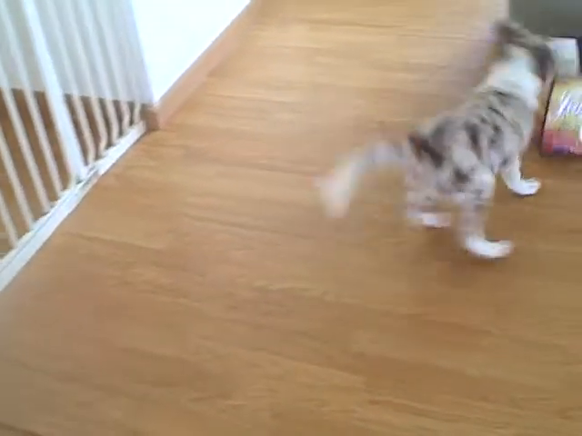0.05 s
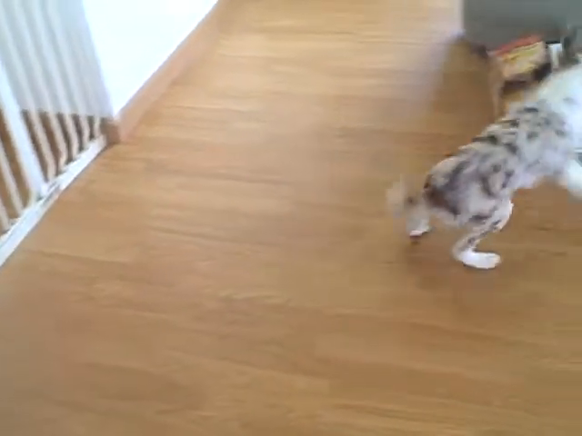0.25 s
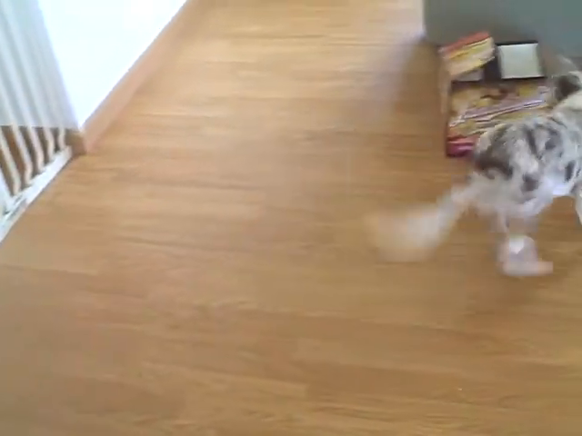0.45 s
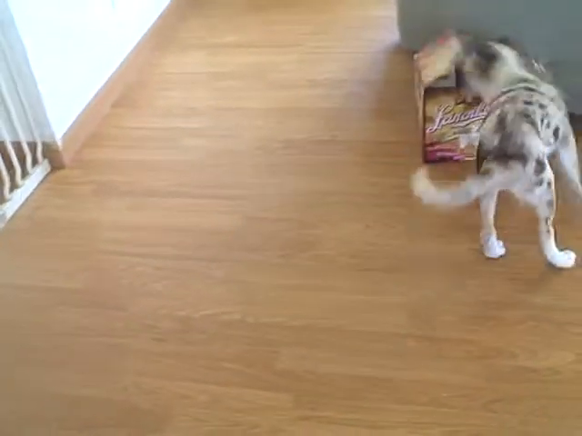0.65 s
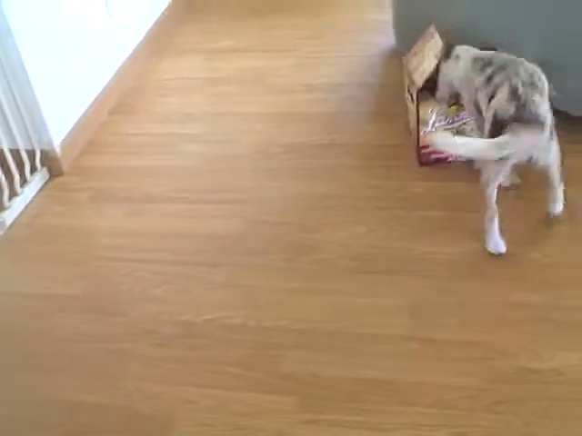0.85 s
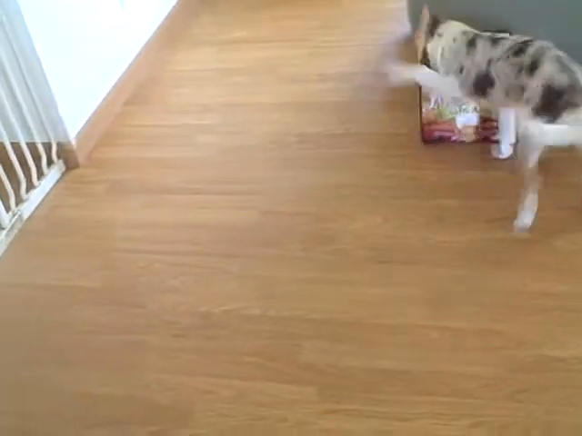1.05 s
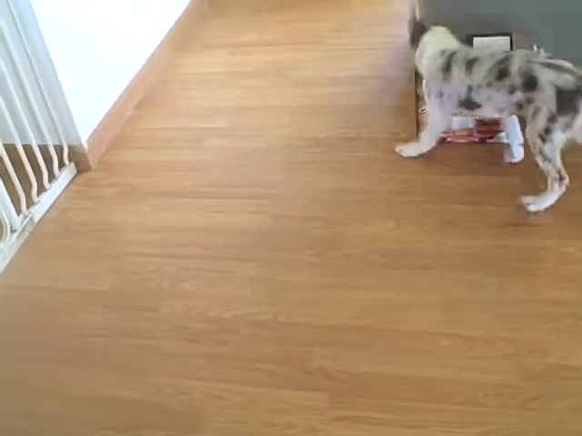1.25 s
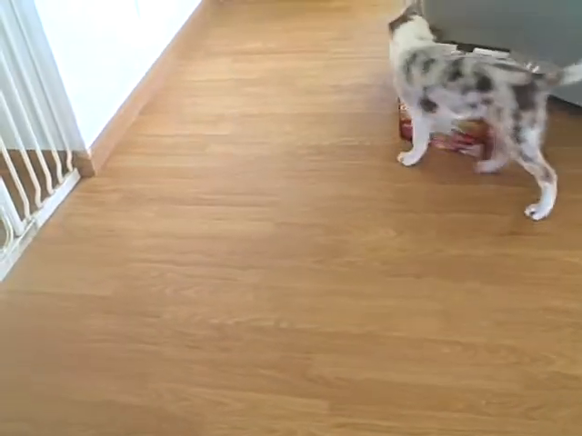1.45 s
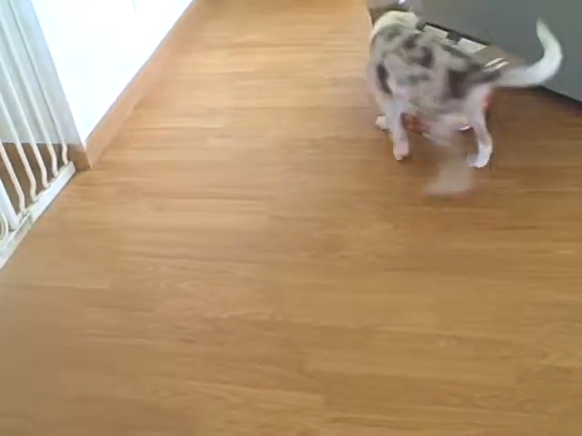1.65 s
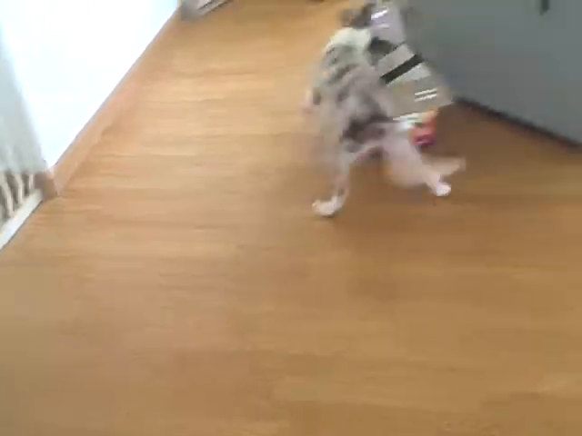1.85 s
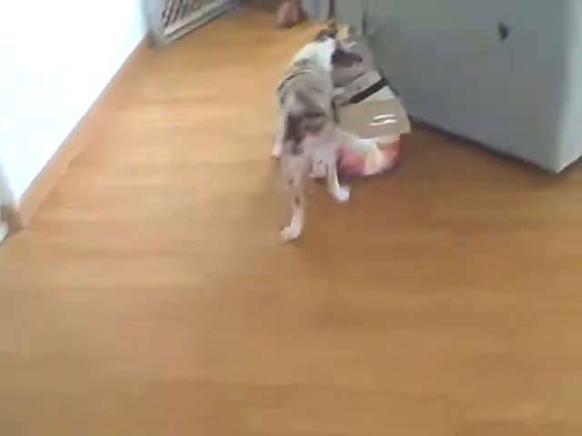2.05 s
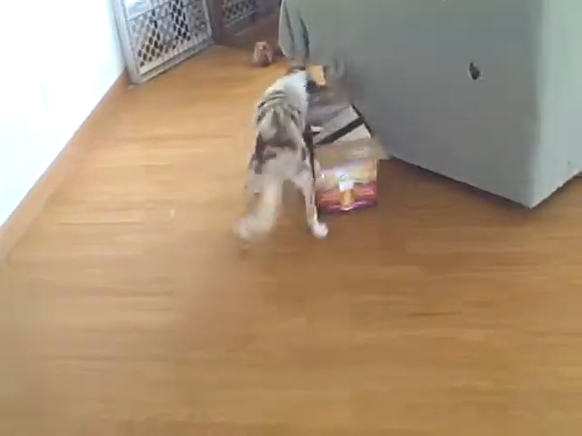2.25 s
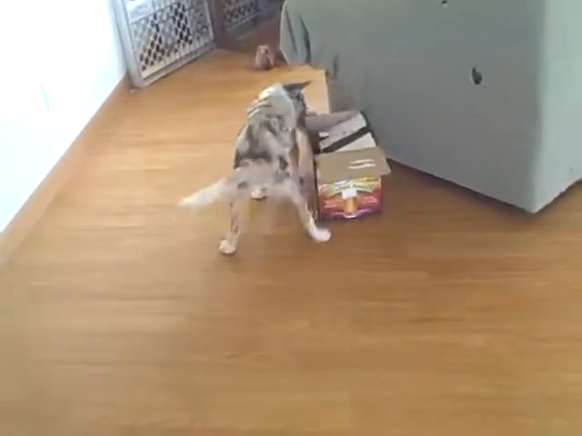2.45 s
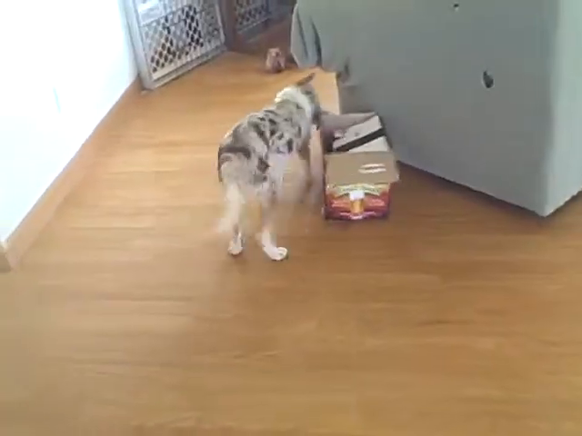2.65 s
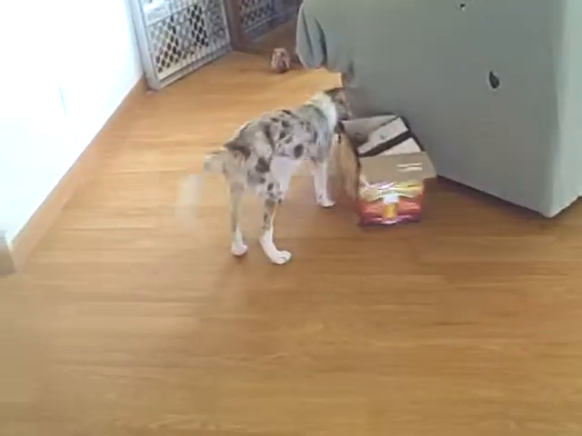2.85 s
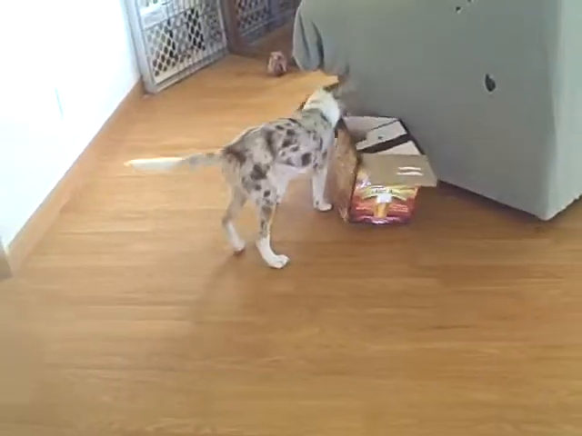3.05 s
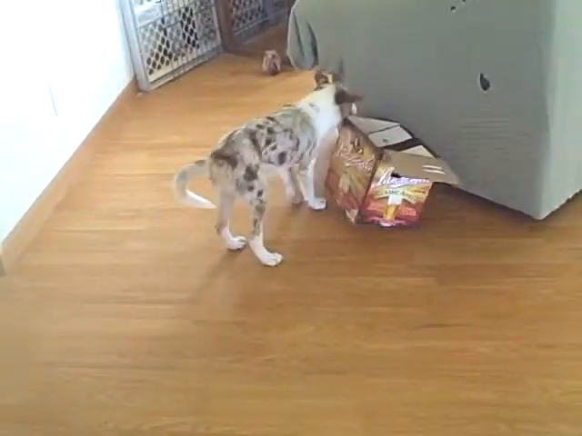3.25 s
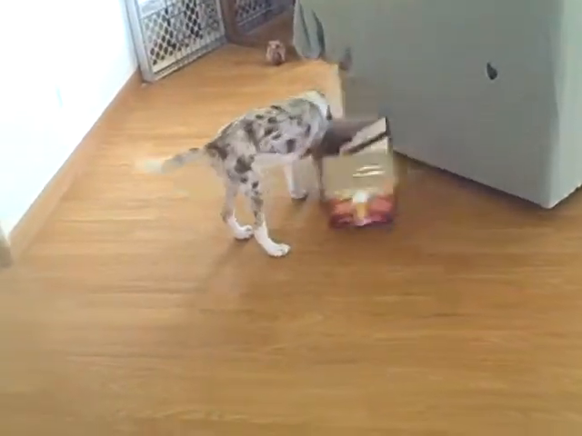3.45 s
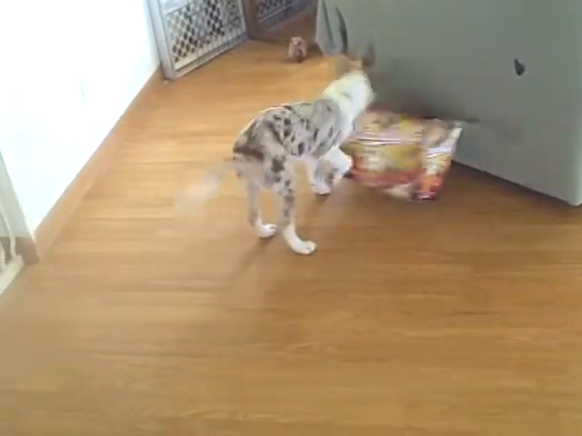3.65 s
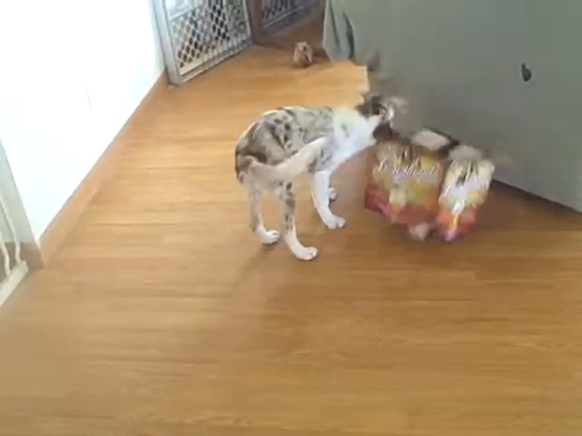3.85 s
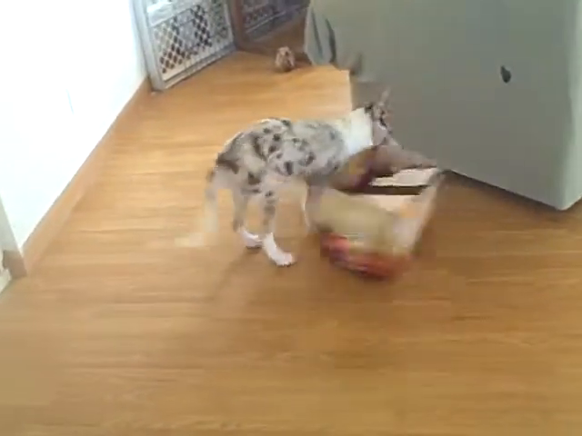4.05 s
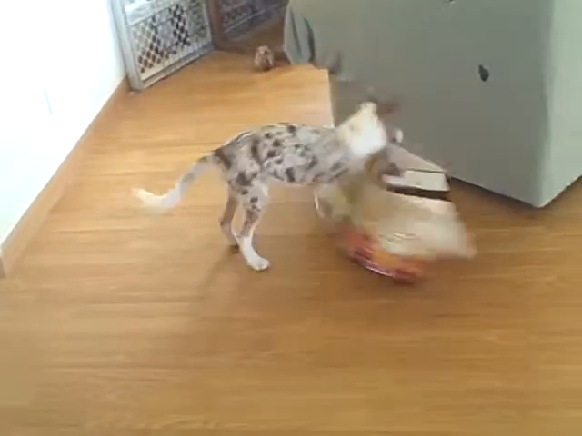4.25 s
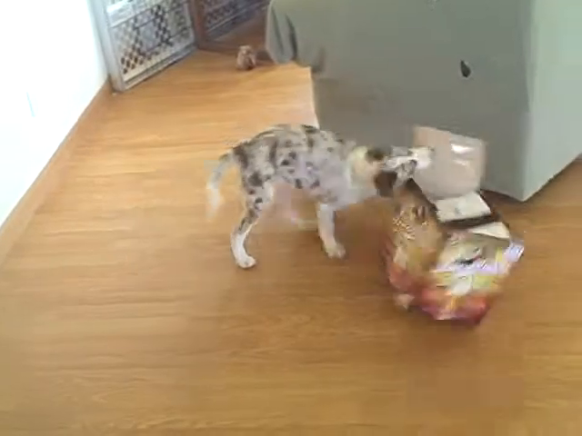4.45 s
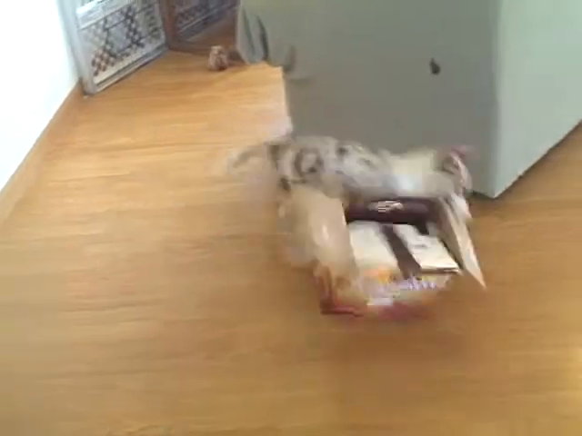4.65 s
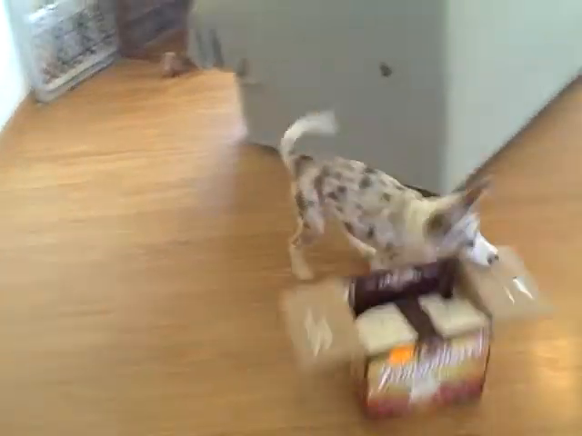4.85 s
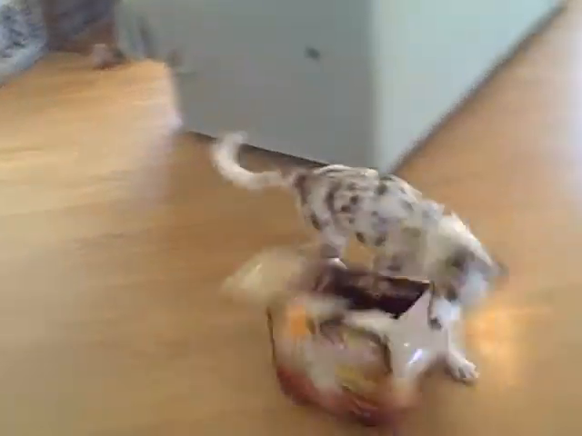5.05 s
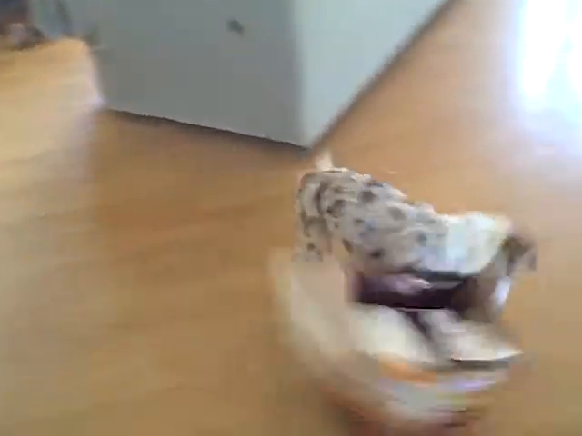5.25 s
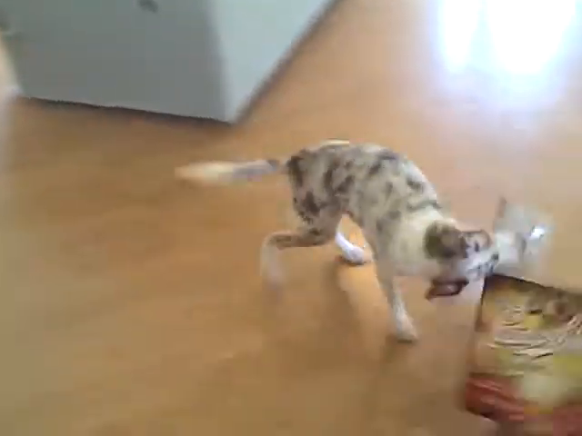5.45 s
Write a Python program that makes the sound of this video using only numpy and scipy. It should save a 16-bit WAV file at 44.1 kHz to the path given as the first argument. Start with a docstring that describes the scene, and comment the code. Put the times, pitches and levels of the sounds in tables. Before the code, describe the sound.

Hollow cardboard bumps, short gritty drags, crisp crackles and claw ticks on floorboards in a bare, echoing room, sparse at first, then a busy clatter.

```python
"""Puppy tugging a cardboard box

A puppy tugs a hollow cardboard box over a wooden floor; the bumps are mostly loudest late on.
Struck panels ring as decaying sines, snapping folds and ticking claws are bursts of coloured noise,
and the scraping bottom is a stream of random stick-slip impulses. Soft footfalls boom and a faint
drone and hiss lie beneath. Decaying noise gives most of the sounds the reverberation of a bare room."""
import sys
import numpy as np
from scipy import signal
from scipy.fft import rfft, irfft, next_fast_len
from scipy.io import wavfile
from scipy.ndimage import uniform_filter1d, map_coordinates

SR = 44100
rng = np.random.default_rng(int(sys.argv[2]) if len(sys.argv) > 2 else 0)


def wav_record(signal):
    """Record a signal, one row per channel, as 16-bit PCM in the file named by sys.argv[1]."""
    frames = np.transpose(np.atleast_2d(signal))
    bounded = np.clip(frames, -1, 1)
    # unit amplitude maps onto the largest positive 16-bit level
    quanta = np.round(bounded * 32767).astype(np.int16)
    wavfile.write(sys.argv[1], SR, quanta)


N = 242550  # samples, 5.5 s

# relative spectrum of a hard tick or a fibre break: f/Hz, level per Hz/dB
TICK_SPECTRUM = [(500, -11), (2000, -9.5), (3500, -9.5), (5000, -5), (6600, 2), (7400, -4.5), (8300, -18.5),
                 (9000, -36.5)]


def amp(db):
    """Amplitude ratio of a level in decibels."""
    return 10 ** (np.asarray(db) / 20)


def unit(x):
    """Normalisation to an rms of 1."""
    return x / np.sqrt(np.mean(x ** 2) + 1e-20)


def crest(x, span):
    """Short-time normalisation: the loudest stretch of span seconds gets rms 1."""
    power = uniform_filter1d(x ** 2, max(int(span * SR), 1))
    return x / np.sqrt(power.max() + 1e-20)


def along(points, hz):
    """Interpolation of (f/Hz, value) points on a logarithmic frequency axis."""
    f, value = np.transpose(points)
    return np.interp(np.log(hz + 1), np.log(f + 1), value)


def colour(x, spectrum, size=8192):
    """Minimum-phase filtering: folding the cepstrum makes the given spectrum causal."""
    magnitude = amp(along(spectrum, np.fft.rfftfreq(size, 1 / SR)))
    cepstrum = irfft(np.log(magnitude))
    cepstrum[1:size // 2] *= 2
    cepstrum[size // 2 + 1:] = 0
    impulse_response = irfft(np.exp(rfft(cepstrum)))
    return signal.fftconvolve(x, impulse_response)[:len(x)]


def wobble(rate):
    """Slow random modulation: a smooth curve through rate random knots a second."""
    knots = rng.standard_normal(int(N * rate / SR) + 4)
    return map_coordinates(knots, [np.arange(N) * rate / SR])


def grains(rate, spread_db, size):
    """Shot noise: tiny slips at random moments, rate a second, with random signs and sizes."""
    chance, strength = rng.random(size), rng.standard_normal(size)
    signs = rng.choice([-1, 1], size)
    return (chance < rate / SR) * signs * amp(spread_db * np.clip(strength, -2, 2))


def strokes(rows, attack, release, fade_db_per_s=0):
    """Gain of (start, length, dB) strokes: linear attack, hold or fade, exponential release."""
    gain, t = np.zeros(N), np.arange(N) / SR
    for start, length, db in rows:
        age = t[t > start] - start
        letting_go = np.exp(-np.maximum(age - length, 0) / release)
        gain[t > start] += amp(db - fade_db_per_s * age) * np.minimum(age / attack, 1) * letting_go
    return gain


def add(track, s, sound):
    """Superposition of a sound on the track from time s."""
    part = track[max(round(s * SR), 0):][:len(sound)]
    part += sound[:len(part)]


def ring(modes, t, scatter_db=4.5, detune=0.032):
    """Modal sum of decaying sines; flexing gives each call slightly new pitches and strengths."""
    total = 0
    for hz, db, t60 in modes:
        decay = amp(db + scatter_db * rng.normal() - 60 * t / t60)
        total = total + decay * np.sin(2 * np.pi * hz * (1 + detune * rng.normal()) * t)
    return total


def tail(t60, build=0.0025):
    """Diffuse reverberation of energy 1: noise that builds up quickly and decays exponentially."""
    t = np.arange(SR * 3 // 5) / SR
    answer = rng.standard_normal(len(t)) * amp(-60 * t / t60) * (1 - np.exp(-t / build))
    return answer / np.linalg.norm(answer)


def room(x, wet_db, t60):
    """Reverberation by convolution: a lasting sound plus its diffuse tail."""
    return x + amp(wet_db) * signal.fftconvolve(x, tail(t60))[:len(x)]


def echo(direct, spectrum, wet_db, t60):
    """A blow plus its reverberation, which mixes all directions and so keeps only the broad colour."""
    answer = colour(tail(t60), spectrum)
    answer *= amp(wet_db) * np.linalg.norm(direct) / np.linalg.norm(answer)
    add(answer, 0, direct)
    return answer


def crumpling(crumple):
    """Fracture cascade: the envelope of fibre breaks that thin out with time constant crumple."""
    t = np.arange(SR // 20) / SR
    breaks = 0.84 * grains(rate=1300, spread_db=5.5, size=len(t)) * np.exp(-t / crumple)
    breaks[0] = 1
    power = signal.fftconvolve(breaks ** 2, np.exp(-t / 0.00092))[:len(t)]
    return np.sqrt(np.abs(power))


def burst(envelope, spectrum):
    """Filtered noise under an envelope: a short coloured burst."""
    noise = envelope * rng.standard_normal(len(envelope))
    return crest(colour(noise, spectrum, size=2048), span=0.0017)


def tick(envelope, hz, hardness):
    """Contact stiffness: the harder the contact, the more tonal ping and the less noise."""
    t = np.arange(len(envelope)) / SR
    share = np.clip(hardness, 0, 0.9)
    ping = crest(t * np.exp(-t / 0.0005) * np.sin(2 * np.pi * hz * t), span=0.0036)
    return np.sqrt(1 - share ** 2) * burst(envelope, TICK_SPECTRUM) + share * ping


def air():
    """Background noise: filtered noise gives a low drone and a faint hiss that waver slightly."""
    # relative spectrum of the background: f/Hz, level per Hz/dB
    air_spectrum = [(15, -41), (35, 8.5), (52, 9.5), (75, -16.5), (130, 2.5), (330, -9.5), (600, -19),
                    (1200, -25), (3000, -22), (5000, -26.5), (6700, -16), (8000, -33), (9000, -56.5)]
    noise = unit(colour(rng.standard_normal(N), air_spectrum))
    return amp(-44.5 + 1.2 * wobble(rate=4)) * noise


def footfalls():
    """Resonance of a sprung floor: a landing paw sets off one low, decaying mode."""
    # the puppy's weight landing on the boards: t/s, relative level/dB
    landings = [(0.12, -29), (0.36, -23.5), (0.62, -26), (0.87, -26), (1.249, -25), (3.759, -21),
                (4.87, -24)]
    out, t = np.zeros(N), np.arange(SR // 2) / SR
    floor_hz, floor_t60_s = 47.6, 0.39  # nominal pitch
    soft_rise = 1 - np.exp(-t / 0.017)  # soft pads set the floor off slowly
    for s, db in landings:
        add(out, s, amp(db) * soft_rise * ring([(floor_hz, 0, floor_t60_s)], t))
    return out


def brushes():
    """Friction noise: a flap's edge catches in fine grains as it sweeps along."""
    # a flap brushing past: start t/s, length/s, relative level/dB
    sweeps = [(2.43, 0.033, -34), (3.215, 0.043, -34.5), (4.51, 0.16, -43)]
    # relative spectrum of a brushing flap: f/Hz, level per Hz/dB
    brush_spectrum = [(1500, -23.5), (3000, -3), (4200, 1.5), (5600, 3.5), (6800, 3.5), (8500, -28.5)]
    texture = unit(colour(grains(rate=4800, spread_db=3, size=N), brush_spectrum))
    sweep = strokes(sweeps, attack=0.01, release=0.062) * texture
    return room(amp(-3.0) * sweep, wet_db=-7.5, t60=0.35)


def skids():
    """Forced vibration: an edge judders over the boards and keeps its panel ringing."""
    # the box skidding on one edge: start t/s, length/s, relative starting level/dB
    slips = [(0.825, 0.25, -33.5), (2.41, 0.11, -40.5), (5.17, 0.2, -36)]
    # panel resonances that a skid excites: nominal f/Hz, relative level/dB, T60/s
    edge_modes = [(810, -0.5, .04), (1010, 13, 0.054), (1450, 0, .04), (1592, 5.5, 0.076), (2140, -26, .03)]
    panel = ring(edge_modes, np.arange(SR // 10) / SR)
    slipping = grains(rate=1200, spread_db=7.5, size=N)
    judder = unit(signal.fftconvolve(slipping, np.diff(panel))[:N])
    gain = strokes(slips, attack=0.012, release=0.04, fade_db_per_s=52.5)  # fades as the box slows
    return room(amp(-7.5) * gain * judder, wet_db=-7.5, t60=0.62)


def slide():
    """Stick-slip friction: coarse jerks drum the box, fine grit rasps and scratches, fibres crinkle."""
    # pulls that drag the box over the boards: start t/s, length/s, relative rumble level/dB
    pulls = [(-0.04, 0.19, -27), (0.2, 0.19, -35.5), (0.77, 0.16, -29), (1.42, 0.2, -45.5),
             (2.25, 0.2, -39), (2.8, 0.16, -43), (3.4, 0.19, -31), (3.56, 0.08, -27), (3.72, 0.15, -33.5),
             (4.4, 0.43, -38), (4.8, 0.7, -30)]
    # cardboard rubbing during a tug: start t/s, length/s, relative rasp level/dB, scratch level/dB
    rubs = [(-0.04, 0.21, -37.5, -40), (0.342, 0.1, -43.5, -27.5), (0.52, 0.42, -66, -44.5),
            (1.34, 0.028, -45, -45), (1.532, 0.16, -62, -38.5), (2.209, 0.08, -40.5, -41.5),
            (2.354, 0.15, -39.5, -40), (2.785, 0.8, -66, -49), (3.38, 0.1, -39, -37.5),
            (3.531, 0.14, -43.5, -47.5), (3.74, 0.18, -39, -34.5), (4.414, 0.48, -44, -40),
            (4.749, 0.21, -49, -37.5), (4.977, 0.93, -45, -42)]
    # relative spectra of jerks, rasping grit and scratching grit: f/Hz, level per Hz/dB
    rumble_spectrum = [(30, -27.5), (75, -2), (120, 1.5), (190, -0.5), (370, 4), (480, -6), (750, -6),
                       (1100, -12), (2000, -27), (5000, -60.5)]
    rasp_spectrum = [(300, -24), (900, 4.5), (1600, 2), (2500, -3), (3800, -6.5), (6000, -17),
                     (9000, -56.5)]
    scratch_spectrum = [(1500, -30), (3500, -9), (5000, -5), (6000, 0.5), (6800, 2.5), (7500, -6.5),
                        (8300, -14.5), (9000, -48)]

    drag = strokes(pulls, attack=0.019, release=0.058)
    rasping = strokes([(s, length, db) for s, length, db, _ in rubs], attack=0.054, release=0.068)
    scratching = strokes([(s, length, db) for s, length, _, db in rubs], attack=0.054, release=0.068)
    jerks = unit(colour(grains(rate=700, spread_db=3.5, size=N), rumble_spectrum))
    grit = unit(colour(grains(rate=2000, spread_db=1.5, size=N), rasp_spectrum))
    fine_grit = unit(colour(grains(rate=3000, spread_db=4, size=N), scratch_spectrum))
    # stray fibre breaks among the scratching
    crinkle = amp(-9) * unit(colour(grains(rate=40, spread_db=4.5, size=N), TICK_SPECTRUM))

    pressure = wobble(rate=30)  # shared by all three layers
    # the box never lies quite still: each layer keeps a resting level
    rest_rumble_db, rest_rasp_db, rest_scratch_db = -46, -55.5, -44.5
    rumble = np.hypot(drag, amp(rest_rumble_db)) * amp(2.5 * pressure) * jerks
    rasp = np.hypot(rasping, amp(rest_rasp_db)) * amp(2.0 * pressure) * grit
    scratch_gain = np.hypot(scratching, amp(rest_scratch_db)) * amp(1.1 * pressure)
    scratch = scratch_gain * (crinkle + fine_grit)
    return room(amp(-3.0) * (rumble + rasp + scratch), wet_db=-6.5, t60=0.67)


def claws():
    """Hard impact: a claw or tooth gives one bright tick and leaves the panels still."""
    # claws and teeth ticking on a hard spot: t/s, relative level/dB, ping f/Hz
    taps = [(0.3884, -21.5, 6470), (0.4319, -11, 7000), (1.128, -30, 5870), (1.2538, -30, 6830),
            (2.6078, -11, 5420), (2.793, -7.5, 6820), (3.7846, -12.5, 6070), (4.2133, -21.5, 6320),
            (4.3853, -6, 6380), (5.1994, -13, 6620)]
    out = np.zeros(N)
    for s, db, hz in taps:
        click = tick(crumpling(crumple=0.0026), hz, hardness=0.9)
        add(out, s, amp(db - 8) * echo(click, TICK_SPECTRUM, wet_db=-4, t60=0.75))
    return out


def snaps():
    """Brittle fracture: a run of fibre breaks ticks brightly, cracks lower and rings the panel."""
    # folds snapping: t/s, relative level/dB, nominal crack f/Hz, crack level re tick/dB, crumple decay/s
    folds = [(0.234, -16.5, 2130, -0.5, 0.0033), (0.2402, -11, 1000, -3, 0.0086),
             (0.3134, -14.5, 931, -27.5, 0.0048), (0.38, -21.5, 1100, -5.5, .005),
             (0.616, -24, 902, -6, 0.0016), (0.7017, -28.5, 910, 0, .0027), (0.7704, -22, 1060, -2, 0.0063),
             (0.813, -16.5, 1360, 1, 0.0038), (1.3575, -27.5, 1260, -16, 0.0037),
             (1.572, -17.5, 2240, -1.5, 0.0016), (1.733, -19.5, 4040, -20.5, .004),
             (2.2059, -17.5, 1710, -7, .003), (2.7384, -25.5, 2040, -5.5, 0.0074),
             (2.938, -29, 2560, 2, 0.0022), (3.2153, -17, 4000, -13.5, 0.0043),
             (3.3517, -5, 980, -22.5, 0.0074), (3.569, -24, 926, -4.5, 0.0047),
             (3.6621, -19.5, 997, -1, 0.008), (3.894, -11.5, 2090, -21.5, 0.0018),
             (4.0122, -12.5, 3150, -15, 0.0023), (4.1182, -18, 1010, 0, 0.0032),
             (4.1412, -21, 920, -5.5, 0.0025), (4.306, -16, 1315, 3.5, 0.0078),
             (4.6768, -14, 1270, -4.5, .005), (4.799, -11, 1820, -12, .003),
             (4.872, -6.5, 916, -19.5, 0.0064), (5.0671, -18, 980, -11.5, .0034),
             (5.138, -12.5, 970, -3, .006), (5.2264, -14, 982, -15.5, 0.00068),
             (5.3009, -18.5, 1080, -23.5, 0.0024), (5.4811, -14.5, 900, -21, 0.0036)]
    # relative spectrum of a crack, before its shift in pitch: f/Hz, level per Hz/dB
    crack_spectrum = [(150, -20.5), (500, 3.5), (1100, 0.5), (2000, 6.5), (2700, -1.5), (4000, -4.5),
                      (6500, -7.5), (9000, -53)]
    out, t = np.zeros(N), np.arange(SR // 10) / SR
    for s, db, crack_hz, crack_db, crumple in folds:
        envelope = crumpling(crumple)
        wet_db = -3 + 799.5 * crumple  # a longer crumple fills the room more
        # a small hard contact hardly moves the panel, so a weak crack goes with a hard tick
        click = tick(envelope, hz=6280, hardness=-crack_db / 40)
        panel = np.multiply(crack_spectrum, [crack_hz / 2000, 1])  # a smaller panel cracks higher
        crack = burst(envelope, panel)
        ringing = ring([(crack_hz, -12.5, 0.057)], t)
        add(out, s, amp(db - 8) * echo(click, TICK_SPECTRUM, wet_db, t60=0.63))
        add(out, s, amp(db + crack_db - 5) * echo(crack, panel, wet_db, t60=0.74))
        add(out, s, amp(db + crack_db) * ringing)
    return out


def knocks():
    """Modal excitation: a bump rings the panel and the whole box; edges then chatter on the boards."""
    # box and paws bumping the floor: t/s, relative level/dB, panel f/Hz, hollow ring re body/dB
    bumps = [(0.003, -13, 228, -8), (0.129, -10.5, 198, -8.5), (0.616, -25, 156, -25),
             (0.649, -29, 156, -26), (0.702, -13.5, 395, -18), (0.759, -6.5, 353, -10),
             (0.787, -27, 261, -3.5), (1.201, -26.5, 152, -25), (1.255, -22.5, 144, -12.5),
             (1.355, -18.5, 215, -25), (1.573, -26, 485, -15.5), (1.635, -20, 174, -13),
             (1.964, -22, 155, -14), (2.17, -21, 227, -21), (2.262, -17, 231, -23),
             (2.786, -17, 166, -16.5), (3.215, -26.5, 338, -3), (3.425, -16, 260, -7),
             (3.567, -14.5, 179, -7.5), (3.61, -17.5, 356, -1.5), (3.667, -4.5, 249, -16.5),
             (3.699, -13, 408, -7.5), (3.784, -15, 332, -7), (4.116, -12.5, 145, -12),
             (4.141, -12.5, 191, -8), (4.305, -1.5, 235, -7), (4.334, -9.5, 394, -10.5),
             (4.351, -12, 188, -17.5), (4.422, -9, 223, -6.5), (4.664, -12, 192, -14),
             (4.677, -7.5, 326, -8.5), (4.87, -4.5, 239, -7), (4.894, -20, 310, -0.5),
             (5.127, -9, 185.4, -6.5), (5.142, -6, 293, -2), (5.151, -16.5, 200, -4),
             (5.223, -19.5, 190, 1)]
    # resonances of the box and of its hollow ring: nominal f/Hz, relative level/dB, T60/s
    box_modes = [(114, -9, 0.091), (189.3, -6, 0.074), (258, -13.5, 0.029), (326.4, -11, 0.085),
                 (385.5, -6, 0.089), (489, -2, 0.022)]
    hollow_modes = [(586.6, 2, 0.081), (661, 7.5, 0.044), (740, -10.5, 0.035), (780, -11.5, 0.011),
                    (930, -3, 0.014), (1256, -8.5, 0.02), (1724, -3, 0.026)]
    # relative spectra of the bump and of the hollow ring in the room: f/Hz, level per Hz/dB
    thud_spectrum = [(30, -25.5), (52, 1.5), (74, -15.5), (115, -3), (185, 0), (280, -2), (385, 0),
                     (470, -5), (650, -19), (1200, -26.5), (4000, -64.5)]
    clatter_spectrum = [(250, -23.5), (520, -6), (660, 1.5), (820, 2.5), (1050, -6.5), (1600, -18.5),
                        (2200, -19.5), (5000, -50.5)]

    out, t = np.zeros(N), np.arange(SR // 5) / SR
    yielding = 1 - np.exp(-t / 0.0016)  # cardboard gives way, so the blow is soft
    for s, db, hz, hollow_db in bumps:
        chatter = 0.14 * grains(rate=600, spread_db=8.0, size=len(t))
        contacts = chatter * np.exp(-t / 0.029)  # the edges settle
        contacts[0] = 1  # the bump itself
        panel = 2 * amp(-60 * t / 0.059) * np.sin(2 * np.pi * hz * t)
        body_ring = yielding * (panel + ring(box_modes, t))
        hollow_ring = yielding * ring(hollow_modes, t)
        body = crest(signal.fftconvolve(contacts, body_ring)[:len(t)], span=0.0093)
        hollow = crest(signal.fftconvolve(contacts, hollow_ring)[:len(t)], span=0.01)
        add(out, s, amp(db - 8.5) * echo(body, thud_spectrum, wet_db=-0.56, t60=0.63))
        add(out, s, amp(db + hollow_db - 8.5) * echo(hollow, clatter_spectrum, wet_db=1.5, t60=0.85))
    radiating_hz = 55  # a small box radiates little bass
    return signal.sosfilt(signal.butter(2, radiating_hz, "high", fs=SR, output="sos"), out)


def scene():
    """Superposition of the room, the puppy and its box at one microphone."""
    background = air() + footfalls()
    friction = brushes() + skids() + slide()
    impacts = claws() + snaps() + knocks()
    return (background + friction + impacts)[None]


def record(dry):
    """Saturation and band limiting: the recorder rounds off high peaks and cuts the top."""
    rounded = dry / (1 + np.abs(dry / 0.75) ** 4) ** (1 / 4)
    top_hz = 9141
    size = next_fast_len(N + SR // 2)
    passed = np.fft.rfftfreq(size, 1 / SR) < top_hz
    return irfft(rfft(rounded, size) * passed, size)[:, :N]


dry = scene()
out = record(dry)
wav_record(out)
```